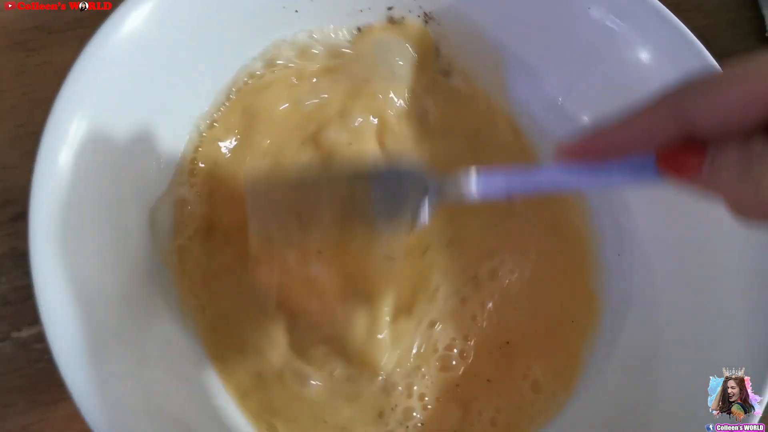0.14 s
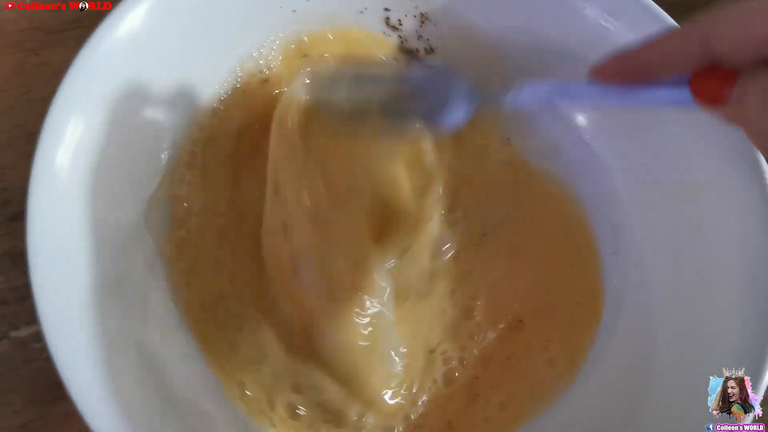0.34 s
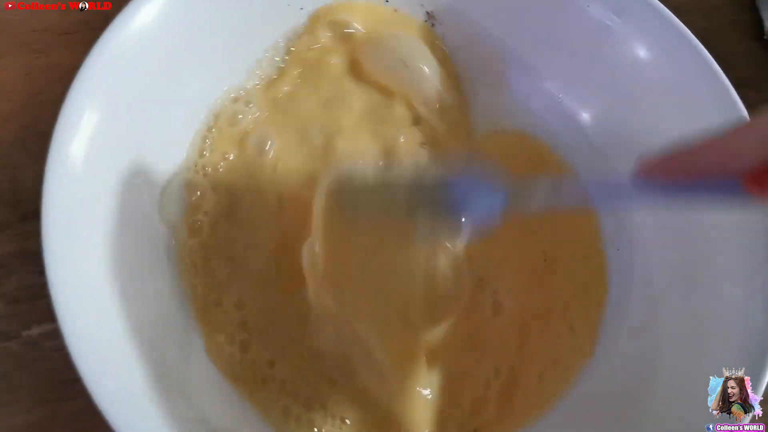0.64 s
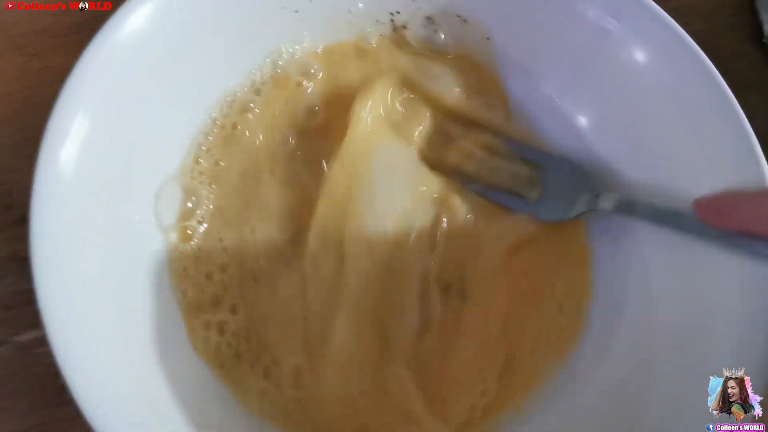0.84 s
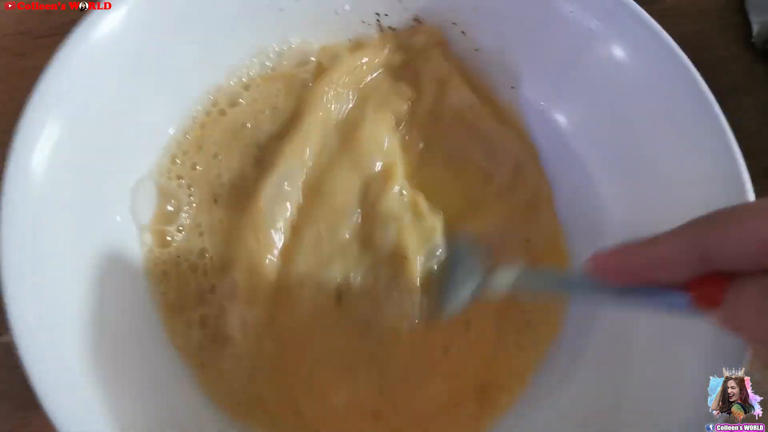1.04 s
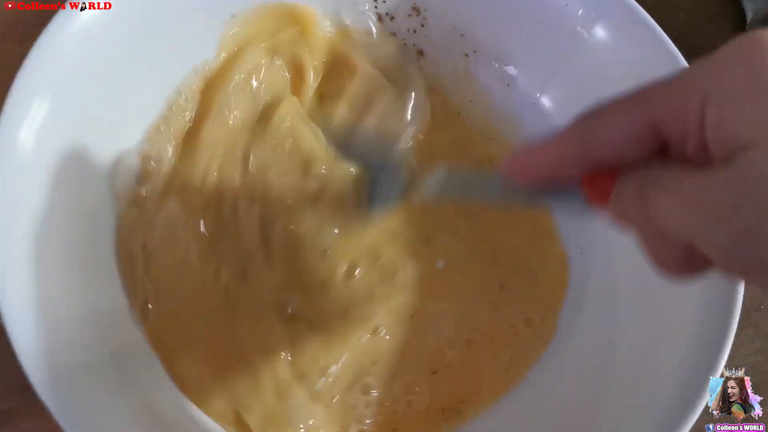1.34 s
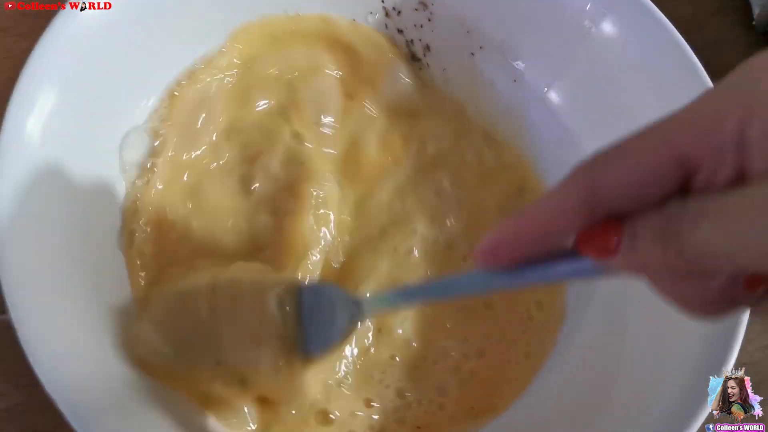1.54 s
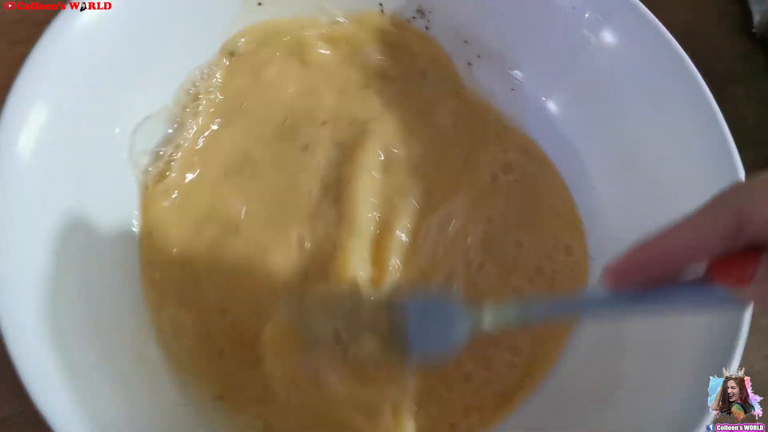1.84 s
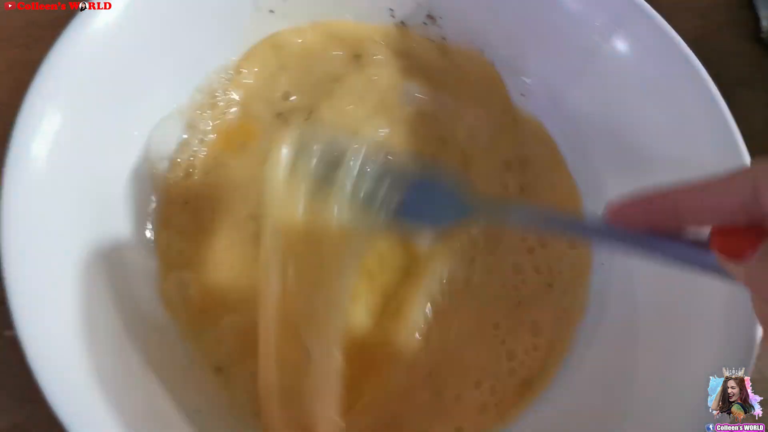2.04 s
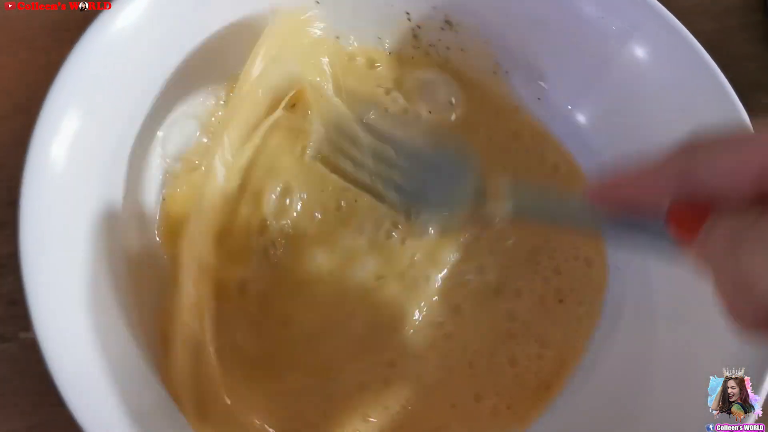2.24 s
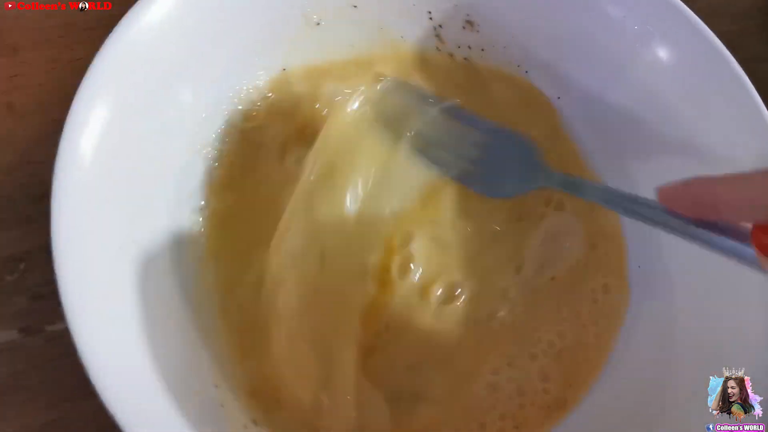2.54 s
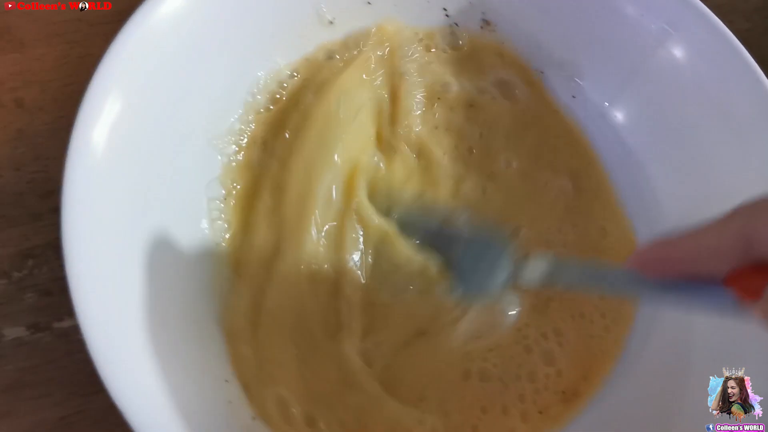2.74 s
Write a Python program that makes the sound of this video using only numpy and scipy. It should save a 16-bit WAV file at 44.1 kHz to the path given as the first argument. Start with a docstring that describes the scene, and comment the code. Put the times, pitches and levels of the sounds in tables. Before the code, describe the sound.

Close, stereo egg beating in a small room: quick regular fork clinks, gritty scrapes and liquid plops throughout, with two brief dull knocks as the bowl rocks on the table, and a very quiet low hum beneath.

```python
"""A fork beats raw eggs in a ceramic bowl, six strokes a second, close to a phone in a small kitchen.
Each stroke grazes the bowl (gritty noise), clicks (noise plus steel modes), pops an air pocket (gliding tone
plus squelch) and scrapes on through crackling froth (grainy noise plus tiny tones). Egg plops back, with the
strokes and between them. Twice the bowl rocks on the table in dull knocks (modes plus thud); mains hum and
a motor beat underneath."""
import sys
import numpy as np
from scipy import signal
from scipy.fft import rfft, irfft
from scipy.io import wavfile
from scipy.ndimage import map_coordinates

SR = 44100
rng = np.random.default_rng(int(sys.argv[2]) if len(sys.argv) > 2 else 0)


def transcribe(signal):
    """Save signal, clipped to [-1, 1], as a 16-bit WAV file at the path in sys.argv[1]."""
    frames = np.atleast_2d(signal).T
    limited = np.clip(frames, -1, 1)
    pcm = np.round(limited * 32767).astype(np.int16)
    wavfile.write(sys.argv[1], SR, pcm)


N = 127890

# Event levels are nominal; the *_OFFSET_DB settings trim them. Balance = left minus right.
# fork strokes: t/s, click/dB, balance/dB, air pocket f/Hz, air pocket/dB, tine ping/dB, bowl body/dB,
# graze/dB, scrape/dB, scrape length/s, graze lead/s, steel ring/dB
STROKES = [(0.068, -29.5, -6, 1390, -35.5, -45.5, -58, -33, -44.5, 0.055, 0.0064, -29.5),
           (0.22, -29, -7.5, 1920, -37, -38, -58, -43, -42, 0.05, 0.0016, -27.5),
           (0.381, -31.5, -5.5, 2000, -49, -36.5, -57, -37, -45, 0.077, 0.001, -26),
           (0.5369, -34, -8, 1530, -41.5, -31, -51, -38, -43, 0.071, 0.00047, -36.5),
           (0.7035, -24.5, -7.5, 2900, -28, -37.5, -56.5, -37.5, -52.5, 0.073, 0.0043, -21.5),
           (0.8603, -34, -4.5, 2190, -34, -49, -51.5, -23, -36.5, 0.04, 0.0033, -32),
           (1.022, -31.5, -1, 2900, -29, -42, -52.5, -27, -35.5, 0.029, 0.0034, -56),
           (1.1802, -30, -1.5, 2520, -35, -66, -59.5, -45, -38.5, 0.067, 0.0073, -32),
           (1.3392, -28.5, -5, 1770, -26, -40, -61.5, -32.5, -40, 0.065, 0.0058, -28.5),
           (1.4963, -26.5, -4, 2625, -33, -41.5, -62, -33.5, -37, 0.058, 0.0022, -26.5),
           (1.668, -28, -1.5, 2715, -31.5, -67, -57, -30, -39, 0.048, 0.0048, -43),
           (1.8155, -27.5, -0.5, 2047, -26.5, -47, -56.5, -34.5, -41.5, 0.038, 0.004, -40.5),
           (1.9722, -40, -7, 2440, -28, -43.5, -51, -24.5, -41, 0.033, 0.0029, -31),
           (2.1349, -28.5, -2.5, 2010, -27.5, -46.5, -50.5, -23.5, -38, 0.058, 0.0031, -30),
           (2.3015, -29.5, -3.5, 2680, -27, -46, -58.5, -33, -42, 0.054, 0.0034, -27.5),
           (2.4619, -29, 2, 2015, -26.5, -46.5, -80, -27.5, -47.5, 0.063, 0.0035, -37),
           (2.617, -28, 0, 2545, -31, -47, -51.5, -29, -53, 0.035, 0.0026, -31),
           (2.7823, -29, -2, 1967, -27.5, -55, -47, -38, -39, 0.053, 0.0013, -39)]
# extra tine taps, some right on a stroke, some after or before it: t/s, level/dB
TAPS = [(0.2253, -31.5), (.385, -27.5), (0.5382, -27), (0.5525, -32.5), (1.3323, -34.5), (1.4916, -38),
        (1.6705, -37), (1.685, -38.5), (1.7102, -39.5), (2.1767, -36.5), (2.4579, -34), (2.503, -39.5),
        (2.533, -46)]
# egg falling back: t/s, f/Hz, level/dB
PLOPS = [(.008, 505, -52.5), (.028, 734, -53), (0.5516, 1800, -30.5), (0.6948, 1364, -35),
         (.7005, 2160, -30.5), (1.182, 1730, -38.5), (1.184, 730, -44), (1.203, 990, -48),
         (1.257, 1480, -38.5), (1.328, 1000, -42), (1.398, 1850, -43.5), (1.519, 1336, -41.5),
         (1.521, 760, -49), (1.71, 1990, -39.5), (2.177, 1840, -47), (2.302, 2030, -28.5),
         (2.505, 2050, -39), (2.617, 1460, -36.5), (2.783, 1025, -40.5)]
# bowl rocking on the table: t/s, level/dB, strongest resonance f/Hz
KNOCKS = [(1.0527, -33, 656), (1.0557, -31, 606), (1.0608, -34, 736), (1.069, -34, 360), (1.078, -39, 345),
          (2.630, -30.5, 975), (2.6463, -30, 740), (2.650, -33.5, 534), (2.6546, -31, 976),
          (2.660, -36.5, 344)]
# modes of the bowl on the table: f/Hz, level/dB, t60/s
TABLE_MODES = [(335, -2, 0.17), (379, -1, 0.12), (599, 3, 0.05), (730, 8, 0.044), (987, -3, 0.044)]
# modes of the fork against the bowl: f/Hz, level/dB, t60/s
FORK_MODES = [(5525, -6.5, 0.014), (6590, -3, 0.014), (6880, 1, 0.011), (8700, -10.5, 0.009),
              (12020, -9.5, 0.015), (13500, -8, 0.0085)]
# spectrum of clicks and grazes: f/Hz, level/dB
CLICK_SPECTRUM = [(200, -19), (550, -7.5), (1100, -11), (1700, 0.5), (2700, 1), (4200, -0.5), (5600, 2),
                  (7000, 4.5), (7900, -7), (8800, -4), (16000, -3)]
# spectrum of tines along glaze: f/Hz, level/dB
SCRAPE_SPECTRUM = [(400, -18), (1200, -8), (1900, 8.5), (2700, 2.5), (4200, 1), (6000, 6), (6850, 11),
                   (7800, -13), (10000, -1), (15500, 3)]
# spectrum of the room tail: f/Hz, level/dB
ROOM_SPECTRUM = [(100, -5), (340, 12), (500, 9), (1100, -1), (2000, 2), (4000, 1), (7000, 3), (16000, 4.5)]
# spectrum of quiet room air: f/Hz, level/dB
AIR_SPECTRUM = [(20, -12), (45, 5), (95, -3), (150, -1.5), (350, -4), (600, -8.5), (1200, -14.5),
                (2500, -18), (5000, -25.5), (16000, -54)]
# hum and motor lines: f/Hz, RMS level/dB
HUM_LINES = [(60, -69), (62.8, -59), (120, -62)]
# spectrum of a knock: f/Hz, level/dB
THUD_SPECTRUM = [(60, -21), (150, -11), (250, -10), (330, 0.5), (700, 1), (1030, -5), (1170, -16.5),
                 (1550, -11.5), (3000, -19.5), (9000, -35)]

# *_TAU_S: e-folding times; *_REL_DB: relative to the sound's first component
AGE_S = np.arange(SR // 2) / SR  # time since a sound's onset
SHARED = 0.24  # noise power common to both sides
AIR_DB, HUM_WAVER_DB = -60.5, 1.5
LINGER_DB, LINGER_TAU_S = -52, 0.029
TAIL_DB, TAIL_T60_S, TAIL_LOW_T60_S, EARLY_DB, EARLY_TAU_S = -10, 0.29, 0.31, -8.5, 0.006  # to direct sound
RIGHT_LAG_S, TOP_HZ = 0.00011, 15800
DRIFT_DB_PER_S, TAP_PAN_DB = 1, -5

POCKET_T60_S, POCKET_RISE_TAU_S, POCKET_GLIDE_PER_S = 0.014, 0.0029, 3.1
POCKET_OFFSET_DB, POCKET_PAN_DB = -0.5, 4.5
SQUELCH_REL_DB, SQUELCH_TAU_S, SQUELCH_WIDTH = -1.5, 0.0049, 0.54

KNOCK_OFFSET_DB, KNOCK_PAN_DB, THUD_REL_DB, THUD_TAU_S = 1, -3.5, 2.5, 0.0042
FOOT_REL_DB, FOOT_CYCLES_PER_T60, BOOM_REL_THUD_DB, BOOM_TAU_S = 2.5, 19, -12.5, 0.033

CLICK_OFFSET_DB, CHATTER_TAU_S, CONTACT_TAU_S = 0.5, 0.0015, 0.00042
TICK_REL_DB, TICK_TAU_S = -3, 0.0009
GRAZE_OFFSET_DB, GRAZE_PEAK_S, GRAZE_RISE_TAU_S, GRAZE_FALL_TAU_S = -3, 0.006, 0.00073, 0.007
TINE_HZ, TINE_T60_S, TINE_OFFSET_DB = 3706, 0.04, 0.5
BODY_HZ, BODY_T60_S, BODY_OFFSET_DB = 552, 0.03, 3
TABLE_TOP_HZ, TABLE_TOP_T60_S, TABLE_TOP_REL_TINE_DB, TABLE_TOP_SPREAD = 345.5, 0.16, -16.5, 0.107
SCRAPE_OFFSET_DB, SCRAPE_GRAIN_DB, SCRAPE_RELEASE_TAU_S = -3.5, 1.5, 0.0092
SCRAPE_START_GAIN, SCRAPE_SWELL_POWER = 0.34, 1.4
CRACKLE_OFFSET_DB, CRACKLE_SPREAD_DB, CRACKLE_T60_S = -11, 4.5, 0.0047
CRACKLE_LOW_HZ, CRACKLE_OCTAVES = 2996, 2.31


def amp(db):
    """Decibels to gain."""
    return 10 ** (np.asarray(db) / 20)


def unit(x):
    """Scale to unit mean energy per channel."""
    return x / np.sqrt(np.sum(x ** 2) / len(np.atleast_2d(x)))


def hit(x, db, span_s):
    """Give a short sound the energy of span_s at RMS level db."""
    return unit(x) * amp(db) * np.sqrt(span_s * SR)


def add(out, x, at_s, pan_db=0):
    """Mix x in at at_s, with a power-preserving left-right balance."""
    start = int(at_s * SR)
    x = np.atleast_2d(x)[:, :N - start]
    sides = amp(np.array([[pan_db], [-pan_db]]) / 2)
    out[:, start:start + x.shape[1]] += x * sides / np.sqrt(np.cosh(pan_db * np.log(10) / 20))


def convolve(x, h):
    """Pass x through the response h."""
    return signal.fftconvolve(np.atleast_2d(x), np.atleast_2d(h), axes=1)[:, :x.shape[-1]]


def colour(x, points, size=2048):
    """Minimum-phase filter through (f/Hz, level/dB) points; white noise keeps its level."""
    hz, db = np.array(points, float).T
    grid_hz = np.arange(size + 1) * SR / 2 / size
    gain = amp(np.interp(np.log(grid_hz + 1), np.log(hz), db))
    cepstrum = irfft(np.log(gain))
    cepstrum[1:size] *= 2  # fold to causal
    cepstrum[size + 1:] = 0
    return convolve(x, unit(irfft(np.exp(rfft(cepstrum)))[:size]))


def noise(shared, n=len(AGE_S)):
    """Stereo white noise, a share of its power common to both sides."""
    z, c = rng.standard_normal((3, n)), np.clip(shared, 0, 1)
    return np.sqrt(c) * z[0] + np.sqrt(1 - c) * z[1:]


def grit(n, db, step_s):
    """Random gain of unit mean power, interpolated in dB between step_s points."""
    gain = amp(db * np.interp(np.arange(n) / SR / step_s, np.arange(4000), rng.standard_normal(4000)))
    return gain / np.sqrt(np.mean(gain ** 2))


def decay(tau_s):
    """Exponential fall from 1."""
    return np.exp(-AGE_S / tau_s)


def ring(hz, t60_s, glide_per_s=0, phase=0):
    """One dying mode; its pitch climbs linearly until t60_s."""
    gliding_s = np.minimum(AGE_S, t60_s)
    warped_s = AGE_S + glide_per_s * gliding_s * (AGE_S - gliding_s / 2)
    return np.sin(2 * np.pi * hz * warped_s + phase) * np.exp(-np.log(1000) * AGE_S / t60_s)


def drift(at_s):
    """Balance of the beating, wandering from right to left, in dB."""
    return DRIFT_DB_PER_S * (at_s - N / SR / 2)


def background():
    """Mains hum and a motor: wavering sines that beat slowly over filtered-noise room air."""
    t_s, out = np.arange(N) / SR, np.zeros((2, N))
    hum = sum(np.sqrt(2) * amp(db) * grit(N, HUM_WAVER_DB, 0.128) * np.sin(2 * np.pi * hz * t_s)
              for hz, db in HUM_LINES)
    air = amp(AIR_DB) * colour(noise(0.73, N), AIR_SPECTRUM)
    add(out, hum + air, 0, 2.8)
    return out


def lingering():
    """Faint room ring from an earlier stroke: decaying scrape-coloured noise at the start."""
    out = np.zeros((2, N))
    add(out, amp(LINGER_DB) * colour(noise(0) * decay(LINGER_TAU_S), SCRAPE_SPECTRUM), 0, TAP_PAN_DB)
    return out


def kitchen(x):
    """Quick reflections from bowl and table, then a short noise tail whose lows last longest."""
    z = noise(0.089)
    low = signal.sosfilt(signal.butter(2, 700, fs=SR, output="sos"), z)
    tail = low * amp(-60 * AGE_S / TAIL_LOW_T60_S) + (z - low) * amp(-60 * AGE_S / TAIL_T60_S)
    tail = tail * (1 - decay(0.0023))
    early = noise(0) * decay(EARLY_TAU_S) * (AGE_S > 0.0007)
    return x + convolve(x, amp(TAIL_DB) * unit(colour(tail, ROOM_SPECTRUM)) + amp(EARLY_DB) * unit(early))


def bowl():
    """The bowl's foot knocks on wood; each contact point brings out another resonance."""
    out = np.zeros((2, N))
    for at_s, db, main_hz in KNOCKS:
        modes = sum(amp(mode_db + 2 * rng.standard_normal())
                    * ring(hz, t60_s, phase=rng.uniform(0, 2 * np.pi))
                    for hz, mode_db, t60_s in TABLE_MODES)
        thud = noise(0.96) * (decay(THUD_TAU_S) + amp(BOOM_REL_THUD_DB) * decay(BOOM_TAU_S))
        knock = unit(colour(modes, THUD_SPECTRUM))
        knock = knock + amp(FOOT_REL_DB) * unit(ring(main_hz, FOOT_CYCLES_PER_T60 / main_hz))
        knock = knock + amp(THUD_REL_DB) * unit(colour(thud, THUD_SPECTRUM))
        add(out, hit(knock, db + KNOCK_OFFSET_DB, 0.0078), at_s, KNOCK_PAN_DB)
    return out


def bubble(hz, db):
    """An air pocket rings in thick egg, rising as it closes, with wet noise around its pitch."""
    tone = ring(hz * 0.994, POCKET_T60_S, POCKET_GLIDE_PER_S) * (1 - decay(POCKET_RISE_TAU_S))
    edge = 1 + SQUELCH_WIDTH / 2
    band = signal.butter(2, [hz / edge, hz * edge], "band", fs=SR, output="sos")
    squelch = signal.sosfilt(band, noise(SHARED) * decay(SQUELCH_TAU_S))
    return hit(unit(tone) + amp(SQUELCH_REL_DB) * unit(squelch), db + POCKET_OFFSET_DB, 0.0073)


def egg():
    """Egg slops back in single plops, each a ringing air pocket."""
    out = np.zeros((2, N))
    for at_s, hz, db in PLOPS:
        add(out, bubble(hz, db), at_s, POCKET_PAN_DB)
    return out


def crackle(length_s, count=50):
    """Froth bubbles burst as the tines drag: tiny decaying sines, denser towards the end."""
    out, age_s = np.zeros((2, N)), AGE_S[:SR // 100]
    for (when, pitch, side), size in zip(rng.random((count, 3)), rng.standard_normal(count)):
        hz = min(CRACKLE_LOW_HZ * 2 ** (CRACKLE_OCTAVES * pitch), TOP_HZ)
        pop = np.sin(2 * np.pi * hz * age_s) * amp(-60 * age_s / CRACKLE_T60_S)
        at_s = np.sqrt(when) * (length_s + SCRAPE_RELEASE_TAU_S)
        add(out, pop * amp(CRACKLE_SPREAD_DB * size), at_s, 20 * (side - 0.5))
    return out[:, :len(AGE_S)]


def click(db, ring_db):
    """Steel meets glaze: bright tick, tine chatter, and modes strong where little egg cushions them."""
    contact = 1 - decay(CONTACT_TAU_S)
    chatter = noise(SHARED) * decay(CHATTER_TAU_S)
    chatter = unit(chatter) * contact
    tick = np.diff(noise(SHARED) * decay(TICK_TAU_S), prepend=0)
    crack = unit(colour(chatter, CLICK_SPECTRUM)) + amp(TICK_REL_DB) * unit(colour(tick, CLICK_SPECTRUM))
    modes = sum(amp(mode_db + 2 * rng.standard_normal())
                * ring(hz * (1 + 0.0074 * rng.standard_normal()), t60_s,
                       phase=rng.uniform(0, 2 * np.pi, (2, 1)))
                for hz, mode_db, t60_s in FORK_MODES)
    return hit(crack, db + CLICK_OFFSET_DB, 0.0063) + hit(modes * contact, ring_db, 0.007)


def graze(db):
    """Tines brush the bowl: gritty noise swelling to GRAZE_PEAK_S, then fading."""
    past_s = AGE_S - GRAZE_PEAK_S
    touch = np.exp(np.minimum(past_s, 0) / GRAZE_RISE_TAU_S - np.maximum(past_s, 0) / GRAZE_FALL_TAU_S)
    rough = noise(SHARED) * touch * grit(len(AGE_S), 2.1, 0.00044)
    return hit(colour(rough, CLICK_SPECTRUM), db + GRAZE_OFFSET_DB, 0.006)


def scrape(db, length_s):
    """Tines catch along the glaze: grainy noise, hardest just before the fork lifts; uncoloured."""
    swell = np.minimum(AGE_S / length_s, 1) ** SCRAPE_SWELL_POWER
    press = SCRAPE_START_GAIN + (1 - SCRAPE_START_GAIN) * swell
    lift = np.exp(-np.maximum(AGE_S - length_s, 0) / SCRAPE_RELEASE_TAU_S)
    catches = grit(len(AGE_S), SCRAPE_GRAIN_DB, 0.00041) * grit(len(AGE_S), 4.5, 0.0092)
    return noise(0.075) * catches * press * lift * amp(db + SCRAPE_OFFSET_DB)


def fork():
    """Each stroke grazes, clicks, pops the egg, rings bowl and table top, and scrapes on; extra taps join."""
    out, rub = np.zeros((2, N)), np.zeros((2, N))
    for (at_s, click_db, pan_db, pocket_hz, pocket_db, tine_db, body_db,
         graze_db, scrape_db, length_s, lead_s, ring_db) in STROKES:
        add(out, click(click_db, ring_db), at_s, pan_db)
        add(out, graze(graze_db), at_s - lead_s - GRAZE_PEAK_S, pan_db)
        add(out, bubble(pocket_hz, pocket_db), at_s, POCKET_PAN_DB)
        ping = ring(TINE_HZ, TINE_T60_S)
        add(out, hit(ping, tine_db + TINE_OFFSET_DB, 0.013), at_s, POCKET_PAN_DB)
        body = ring(BODY_HZ, BODY_T60_S) * (1 - decay(0.0048))
        add(out, hit(body, body_db + BODY_OFFSET_DB, 0.019), at_s, KNOCK_PAN_DB)
        table_top = sum(ring(TABLE_TOP_HZ * (1 + TABLE_TOP_SPREAD * z), TABLE_TOP_T60_S)
                        for z in rng.standard_normal(size=4))
        add(out, hit(table_top * (1 - decay(0.016)), tine_db + TABLE_TOP_REL_TINE_DB, 0.038), at_s)
        froth = hit(crackle(length_s), scrape_db + CRACKLE_OFFSET_DB, length_s)
        add(out, froth, at_s, TAP_PAN_DB + drift(at_s))
        add(rub, scrape(scrape_db, length_s), at_s, -4 + drift(at_s))
    for at_s, db in TAPS:
        add(out, click(db + 1.5, db - 7), at_s, TAP_PAN_DB + drift(at_s))
    return out + colour(rub, SCRAPE_SPECTRUM)


def scene():
    """Fork, egg and bowl in the kitchen, reaching the right microphone RIGHT_LAG_S later."""
    left, right = kitchen(fork() + egg() + bowl())
    right = map_coordinates(right, [np.arange(N) - RIGHT_LAG_S * SR], order=5)
    return np.array([left, right]) + lingering() + background()


def record(dry):
    """The phone cuts the top: steep elliptic low-pass at TOP_HZ."""
    return signal.sosfilt(signal.ellip(8, 0.2, 70, TOP_HZ, fs=SR, output="sos"), dry)


dry = scene()
out = record(dry)
transcribe(out)
```